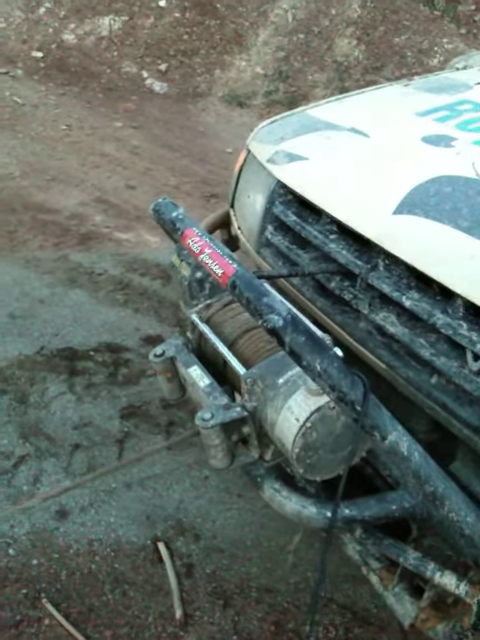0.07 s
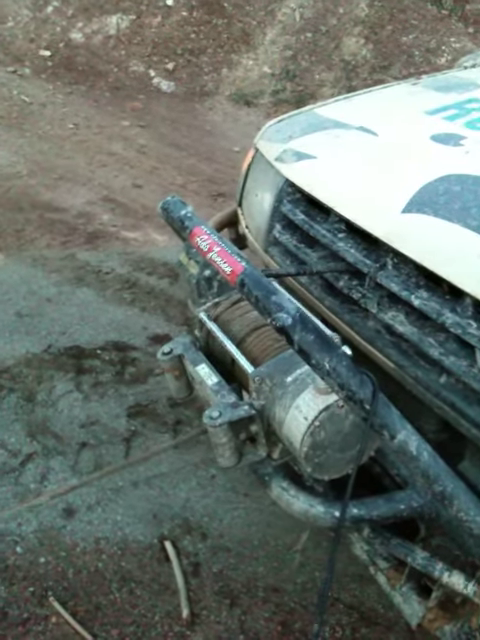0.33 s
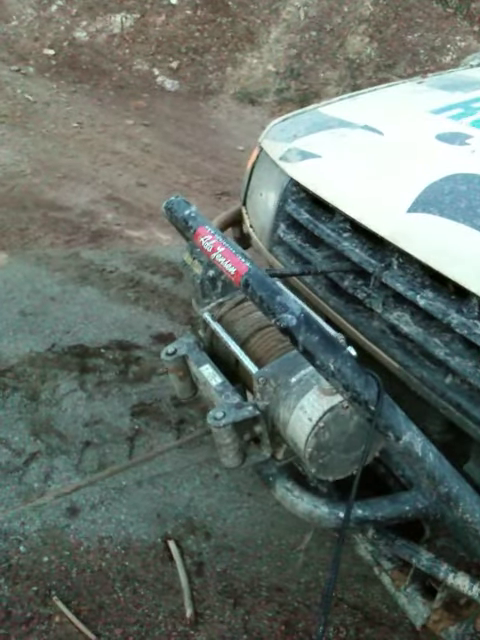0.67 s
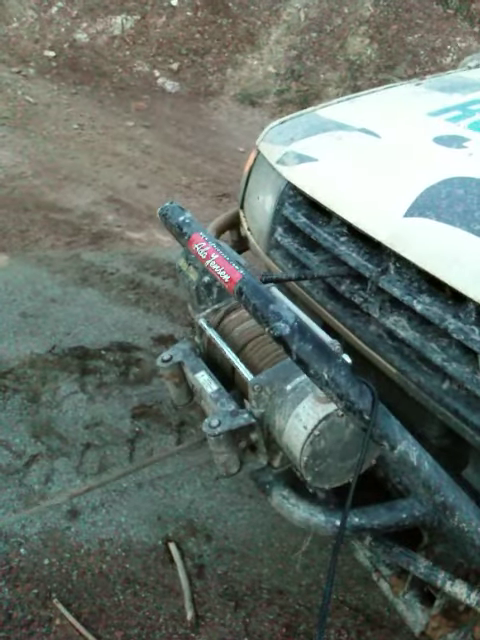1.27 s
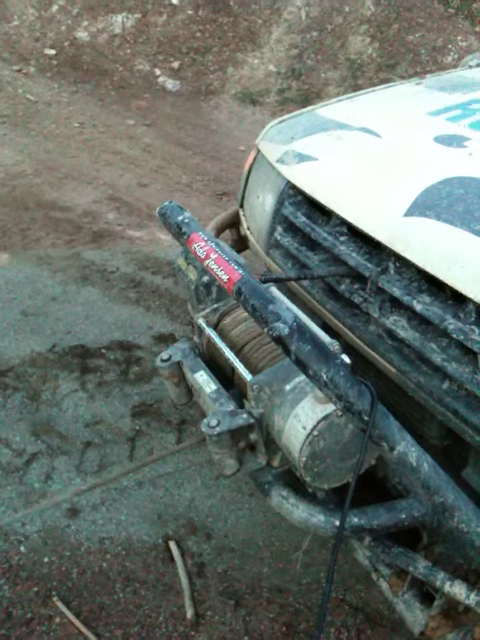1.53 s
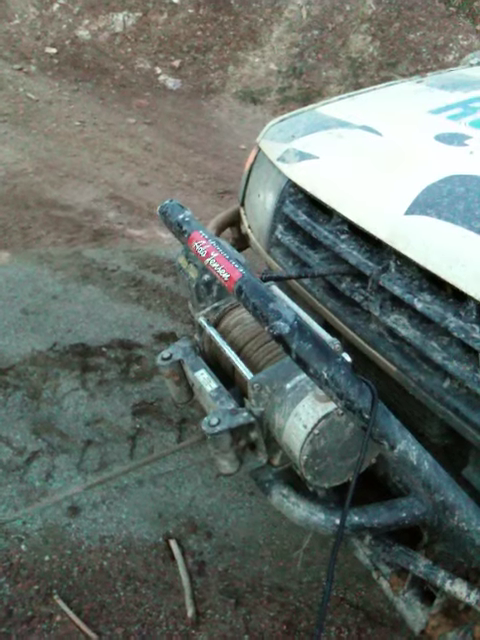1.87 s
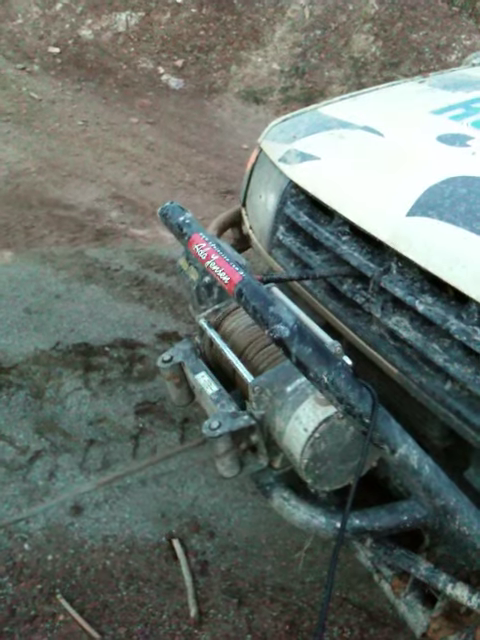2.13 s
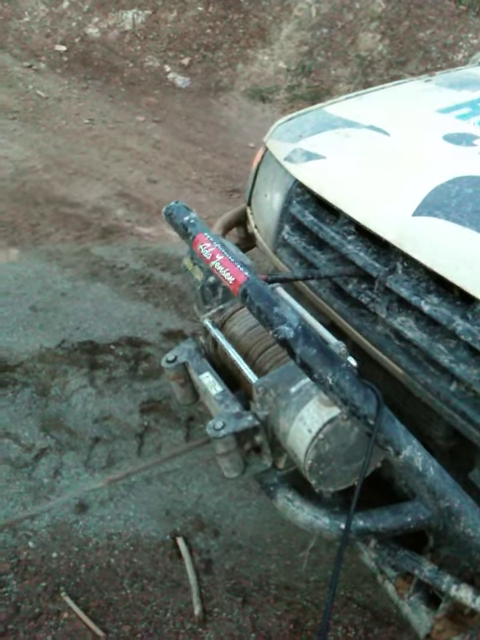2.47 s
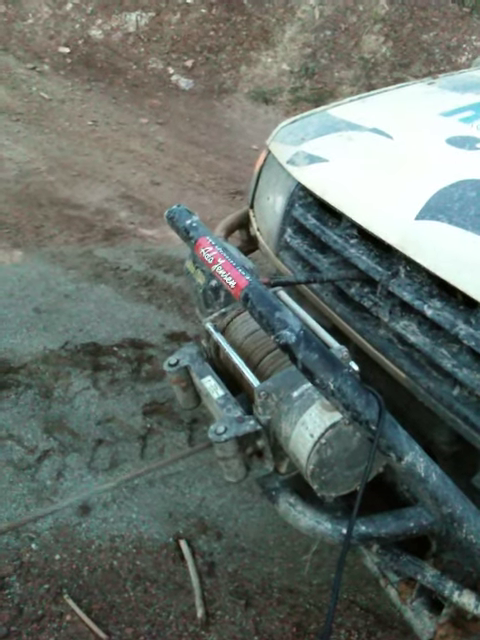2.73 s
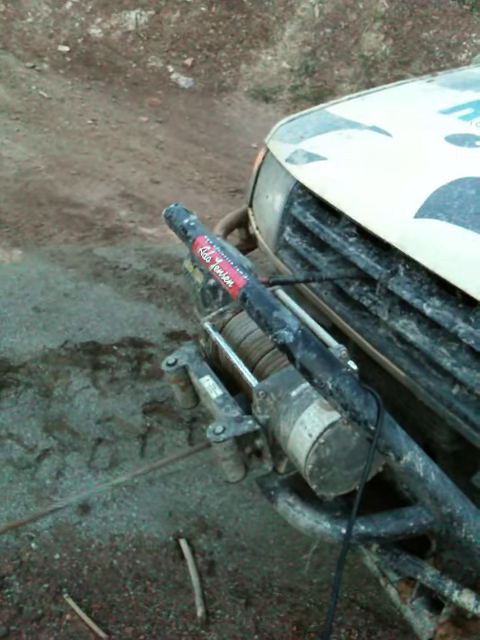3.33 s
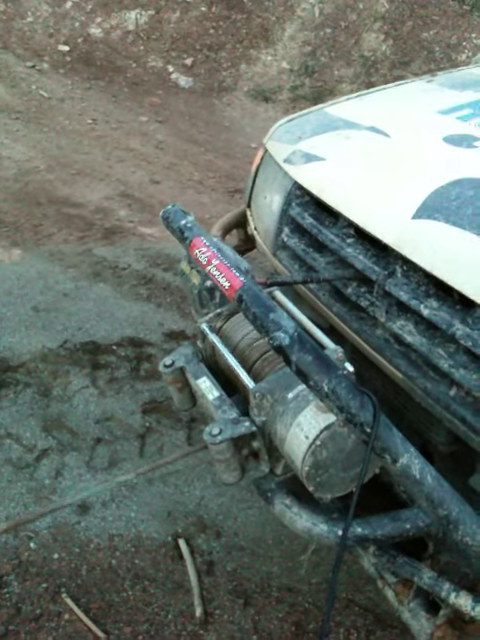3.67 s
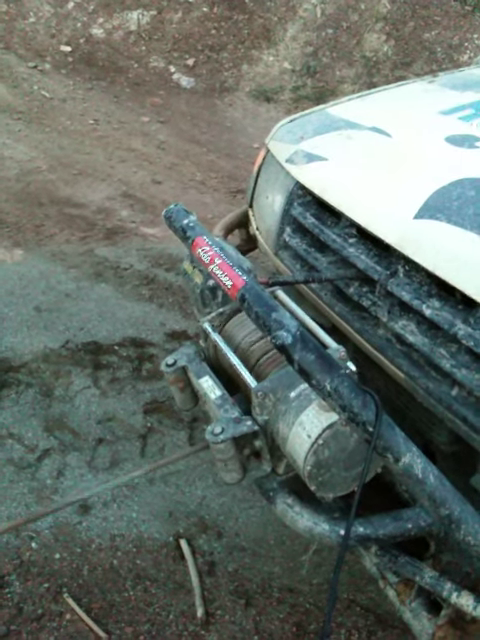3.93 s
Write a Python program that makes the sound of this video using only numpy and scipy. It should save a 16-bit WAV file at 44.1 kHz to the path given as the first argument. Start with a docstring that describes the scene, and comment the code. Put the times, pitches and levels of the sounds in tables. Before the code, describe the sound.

An off-road truck engine idles fast, then revs up and holds while a winch motor runs.

```python
"""A muddy track, one microphone close to an off-road truck at a fast idle, then revved up and held.
The exhaust booms as the speed climbs, and the cooling fan, on the same crankshaft, hums and roars with it.
A second motor, probably the winch, runs up twice, with a dry rasp, short scrapes and squeaks,
and a few gritty ticks. One brief, dull click cuts across the sound."""
import sys
import numpy as np
from scipy import signal
from scipy.fft import rfft, irfft
from scipy.io import wavfile
from scipy.ndimage import uniform_filter1d

SR = 44100
rng = np.random.default_rng(int(sys.argv[2]) if len(sys.argv) > 2 else 0)


def generate_wav(sig):
    """Save sig (samples, or channels by samples) to the path in sys.argv[1] as 16-bit PCM at SR."""
    pcm = np.round(np.clip(np.atleast_2d(sig).T, -1, 1) * 32767).astype(np.int16)
    wavfile.write(sys.argv[1], SR, pcm)


N = 176400
T = np.arange(N) / SR

# rushing air, ahead of its trims: time_s, roar_db, hiss_db
AIR_LEVELS = [(0.05, -36, -46), (0.13, -33.5, -46.5), (0.62, -34, -47.5), (1.25, -29.5, -43),
              (2.55, -25.5, -40), (3.31, -26, -39.5), (3.95, -24.5, -39)]
# noise spectra of the air, winch gears, grit and idling block: frequency_hz, relative_db
ROAR_SPECTRUM = [(20, -22), (65, -38), (100, -1.5), (170, 4), (260, 3.5), (380, 1.5), (520, -1.5), (620, 1),
                 (720, -0.5), (830, 2), (1020, -5), (1270, -3), (1600, -8.5), (2200, -13.5), (3200, -21),
                 (6000, -63)]
HISS_SPECTRUM = [(500, -41), (2000, 1.5), (3200, -2), (4300, 1), (5500, -3), (7000, 1), (8600, -2.5),
                 (10300, -6.5), (12000, -8.5), (13800, -16), (16000, -18)]
RASP_SPECTRUM = [(700, -42), (1500, -2), (2000, 1.5), (2500, -0.5), (3200, -12), (4600, -8.5), (6000, -13),
                 (8500, -17), (10200, -10.5), (12500, -19), (16000, -30)]
SCRAPE_SPECTRUM = [(900, -23), (2000, 6), (3200, -3), (6000, -9), (8500, -7), (10200, -3), (12000, -16),
                   (16000, -26)]
TICK_SPECTRUM = [(1000, -15), (4000, 5), (9000, -2), (15000, -1), (16000, -12)]
RUMBLE_SPECTRUM = [(20, -45), (70, -36), (100, -8), (200, 0), (370, -2), (500, -11.5), (640, -10),
                   (1200, -25.5), (4000, -34)]
# scrapes: start_s, length_s, level_db
SCRAPES = [(0.204, 0.091, -40), (2.607, 0.067, -28.5), (2.648, 0.056, -30.5)]
# dry squeaks: start_s, length_s, pitch_hz, level_db
SQUEAKS = [(0.202, 0.053, 1900, -34.5), (2.372, 0.038, 2350, -32), (2.435, 0.039, 2120, -31.5),
           (2.47, 0.064, 1850, -33), (2.625, 0.031, 2030, -34)]
# gritty ticks: start_s, level_db
TICKS = [(.16, -47), (1.335, -37), (2.296, -31), (2.44, -31), (2.97, -35), (3.013, -30)]
# rasp of the winch gears: time_s, level_db
RASP_LEVELS = [(0, -45), (.17, -38), (.24, -36.5), (.34, -37), (.6, -41.5), (1.25, -58), (1.38, -37),
               (1.6, -42.5), (2.25, -41.5), (2.32, -32.5), (2.48, -33), (2.58, -33), (2.75, -37),
               (3.3, -35.5), (4, -36.5)]
# winch motor, one list a run: time_s, pitch_hz, level_db
WINCH_RUNS = [
    [(0, 100, -52), (.12, 106, -38), (.3, 125, -32), (.45, 122, -37.5), (.7, 104, -36.5), (1, 90, -37)],
    [(2.28, 90, -54), (2.38, 100, -32), (2.56, 119, -25.5), (3, 123, -31), (3.42, 124, -27),
     (3.6, 116, -32.5), (3.85, 103, -32.5), (4, 96, -43)],
]
# its tones, relative to the run: pitch_multiple, powered_db, slowing_db
WINCH_TONES = [(1, -1.5, -2), (1.5, -10, -5), (2, -12, -3), (2.5, -14, 0), (3.5, -25, -1.5), (4, -9.5, -26)]
# fan overtones: blade_note_multiple, full_speed_db, width_hz
FAN_OVERTONES = [(2, -30.5, 43), (3, -36.5, 50), (4, -43.5, 240)]
# engine speed: time_s, crank_hz
CRANK_SPEED = [(0, 53.7), (0.65, 53.5), (1, 65.2), (1.25, 73.1), (1.55, 80.9), (2, 85.5), (2.5, 90.5),
               (3, 92.6), (3.5, 94.5), (4, 96)]
# main engine notes: time_s, order_2_db, order_3_db, order_4_db, order_5_db, fan_blade_db
NOTE_LEVELS = [(0, -43, -28, -22.5, -33, -44), (0.6, -41, -25.5, -23.5, -29.5, -48),
               (0.8, -24, -19.5, -20, -35, -47), (1, -19, -24, -21.5, -29.5, -41),
               (1.15, -15.5, -39, -23, -31, -34), (1.3, -14, -31, -33.5, -27, -25.5),
               (1.55, -11.5, -32.5, -34, -29.5, -27), (1.85, -12, -33, -35, -29, -27),
               (2.25, -12, -28.5, -44, -38, -28.5), (2.5, -14.5, -27.5, -50, -37, -40),
               (2.9, -13.5, -27, -36, -38, -29), (3.15, -13, -30, -49.5, -36, -31),
               (3.6, -10, -28.5, -50, -56, -24.5), (4, -10, -31.5, -43, -45, -27.5)]
# weak tones locked to the crank, among them one at half the fan's blade note (2.31): crank_multiple,
# full_speed_db, idle_change_db
WEAK_ORDERS = [(1, -36.5, -46), (1.659, -32.5, -33), (2.31, -34, -1), (2.532, -39.5, -6.5), (3.5, -38.5, 5),
               (5.97, -43.5, 2), (6.954, -44, 6.5), (8.99, -41.5, -7), (11.02, -48.5, 5), (21.72, -63, 16)]


def amp(db):
    """Decibels to gain."""
    return 10 ** (np.asarray(db) / 20)


def unit(x):
    """Scales to rms 1."""
    return x / np.sqrt(np.mean(x ** 2) + 1e-20)


def curve(rows, column):
    """One column of a time table, at every sample."""
    rows = np.array(rows)
    return np.interp(T, rows[:, 0], rows[:, column])


def noise(spectrum):
    """Noise of rms 1 with the given spectrum."""
    points_hz, db = np.transpose(spectrum)
    hz = np.fft.rfftfreq(N, 1 / SR)
    gain = amp(np.interp(np.log(hz + 1), np.log(points_hz), db))
    return unit(irfft(rfft(rng.standard_normal(N)) * gain, N))


def drift(rate_hz):
    """A random wander of rms 1, up to about the given rate."""
    hz = np.fft.rfftfreq(N, 1 / SR)
    return unit(irfft(rfft(rng.standard_normal(N)) / (1 + (hz / rate_hz) ** 2), N))


def angle(hz):
    """Shaft angle in radians for a speed curve."""
    return 2 * np.pi * np.cumsum(hz) / SR


def tone(phase, flutter, flutter_hz=24.7):
    """A sine of rms near 1 that flutters in strength and phase."""
    in_phase = (1 + flutter * drift(flutter_hz)) * np.sin(phase)
    quadrature = flutter * drift(flutter_hz) * np.cos(phase)
    return np.sqrt(2) * (in_phase + quadrature)


def blurred(phase, width_hz):
    """A tone smeared into a narrow band of noise."""
    return drift(width_hz / 2) * np.sin(phase) + drift(width_hz / 2) * np.cos(phase)


def burst(start_s, decay_s):
    """A sudden envelope that dies away."""
    return (T >= start_s) * np.exp(-np.maximum(T - start_s, 0) / decay_s)


def arch(start_s, length_s):
    """An envelope that swells and fades."""
    return np.sin(np.pi * np.clip((T - start_s) / length_s, 0, 1))


def air(crank, roar_trim_db=2, hiss_trim_db=4):
    """Roar and hiss from the engine bay, throbbing with each firing, twice a turn."""
    throb = np.cos(2 * crank)
    roar = amp(roar_trim_db + curve(AIR_LEVELS, column=1)) * noise(ROAR_SPECTRUM)
    hiss_db = hiss_trim_db + curve(AIR_LEVELS, column=2) + 0.6 * drift(rate_hz=16)
    hiss = amp(hiss_db) * noise(HISS_SPECTRUM)
    return roar * (1 + 0.16 * throb) + hiss * (1 + 0.038 * throb)


def dull_click(start_s=1.386, ring_hz=121, cutoff_hz=1400):
    """One brief, dull click: a sudden step that rings low and dies at once."""
    ring = np.cos(2 * np.pi * ring_hz * (T - start_s))
    pulse = amp(-4.5) * burst(start_s, decay_s=0.005) * ring
    return signal.lfilter(*signal.butter(2, cutoff_hz, fs=SR), pulse)


def grit():
    """Scrapes and narrow-band squeaks swell and fade; ticks start sharply and die away."""
    scrapes = sum(amp(db) * arch(start, length) for start, length, db in SCRAPES)
    squeaks = sum(amp(db) * arch(start, length) * blurred(2 * np.pi * hz * T, width_hz=63)
                  for start, length, hz, db in SQUEAKS)
    ticks = sum(amp(db) * burst(start, decay_s=0.011) for start, db in TICKS)
    return scrapes * noise(SCRAPE_SPECTRUM) + squeaks + ticks * noise(TICK_SPECTRUM)


def winch(full_slowing_hz_per_s=45):
    """The motor runs up, holds and winds down, its half tones coming out as it slows; the gears rasp."""
    rasp_db = curve(RASP_LEVELS, column=1) + 1.4 * drift(rate_hz=27)
    out = amp(rasp_db) * noise(RASP_SPECTRUM)
    for run in WINCH_RUNS:
        hz = curve(run, column=1)
        start_s, end_s = run[0][0], run[-1][0]
        running = uniform_filter1d(1. * ((T >= start_s) & (T <= end_s)), size=1500)
        fall_hz_per_s = uniform_filter1d(-np.gradient(hz) * SR, size=5000)
        slowing = np.clip(fall_hz_per_s / full_slowing_hz_per_s, 0, 1)
        for multiple, powered_db, slowing_db in WINCH_TONES:
            level_db = curve(run, column=2) + powered_db + (slowing_db - powered_db) * slowing
            out += running * amp(level_db) * tone(multiple * angle(hz), flutter=0.04)
    return out


def fan(crank, crank_hz, blades_per_crank_turn=4.6, db_per_octave=23.5):
    """The belt-driven fan: a blade note, and overtones blurred by turbulence that grow with speed."""
    blades = blades_per_crank_turn * crank
    out = amp(curve(NOTE_LEVELS, column=5)) * tone(blades, flutter=0.14)
    speed_db = db_per_octave * np.log2(crank_hz / crank_hz.max())
    for multiple, db, width_hz in FAN_OVERTONES:
        out += amp(db + speed_db) * blurred(multiple * blades, width_hz)
    return out


def exhaust(crank, idling):
    """A clean firing note, rougher orders around it, and the block's rumble at idle."""
    out = amp(curve(NOTE_LEVELS, column=1)) * tone(2 * crank, flutter=0.023)
    for order in (3, 4, 5):
        phase = order * crank + np.pi / 2 * order ** 2  # spread over the turn for an even hum
        out += amp(curve(NOTE_LEVELS, column=order - 1)) * tone(phase, flutter=0.084)
    for order, db, idle_change_db in WEAK_ORDERS:
        phase = order * crank + 2 * np.pi * rng.random()
        out += amp(db + idle_change_db * idling) * tone(phase, flutter=0.13)
    return out + amp(-32) * idling * noise(RUMBLE_SPECTRUM)


def scene():
    """Beside the truck: one crankshaft drives exhaust, fan and air; the winch runs on its own."""
    crank_hz = uniform_filter1d(curve(CRANK_SPEED, column=1), size=3000)
    waver = 1 + 0.003 * drift(rate_hz=13.6)
    crank = angle(crank_hz * waver)
    idling = (crank_hz.max() - crank_hz) / np.ptp(crank_hz)  # 1 at idle, 0 at full speed
    low_cut = signal.butter(6, 79, "highpass", fs=SR, output="sos")
    bay = signal.sosfilt(low_cut, fan(crank, crank_hz) + air(crank) + winch())
    return (exhaust(crank, idling) + bay + grit() + dull_click())[None]


def record(dry):
    """One close microphone, its top end cut at 15.9 kHz."""
    high_cut = signal.firwin(511, 15900, window=("kaiser", 9), fs=SR)
    return signal.oaconvolve(dry, high_cut[None], "same")


dry = scene()
out = record(dry)
generate_wav(out)
```